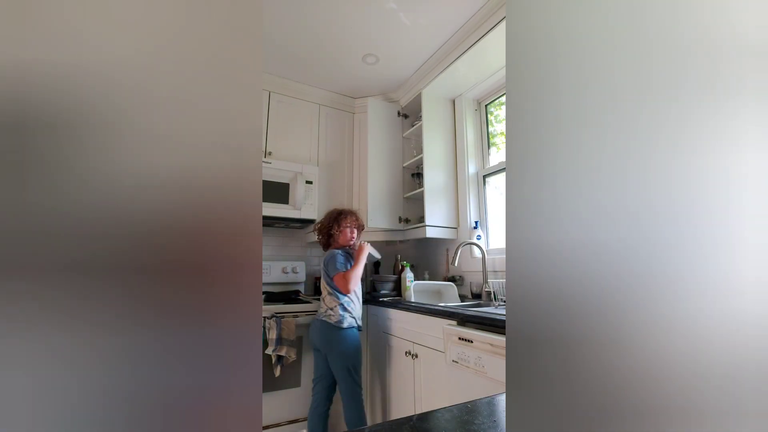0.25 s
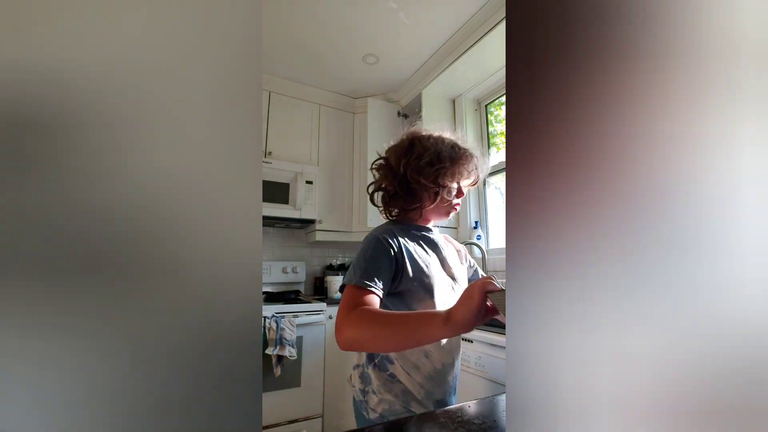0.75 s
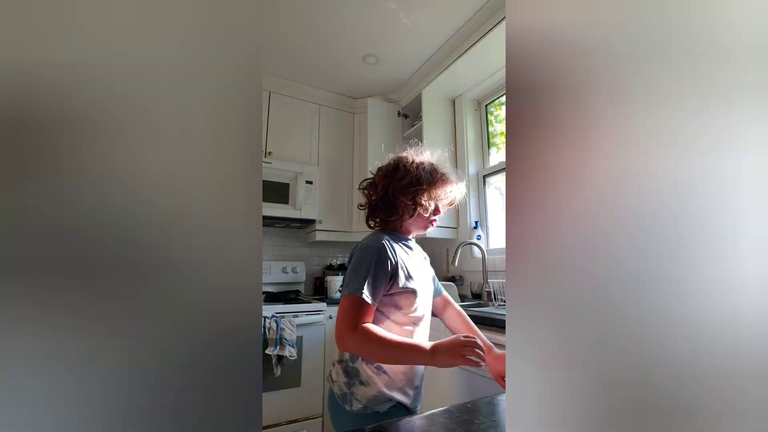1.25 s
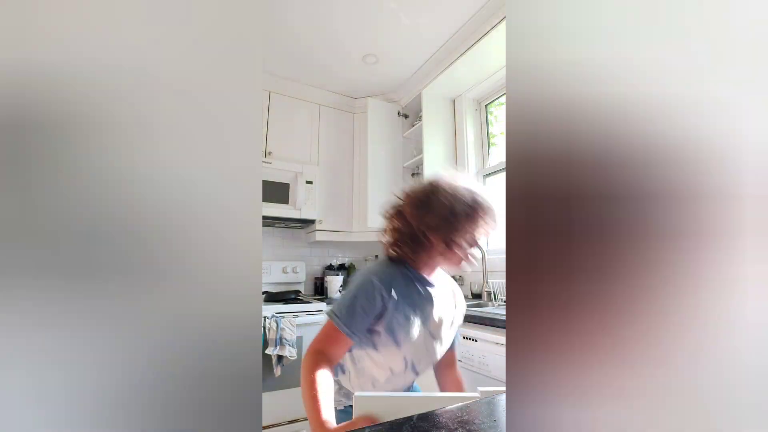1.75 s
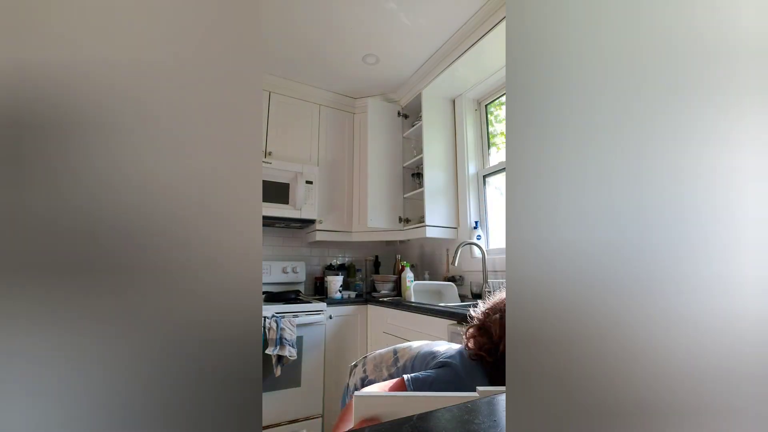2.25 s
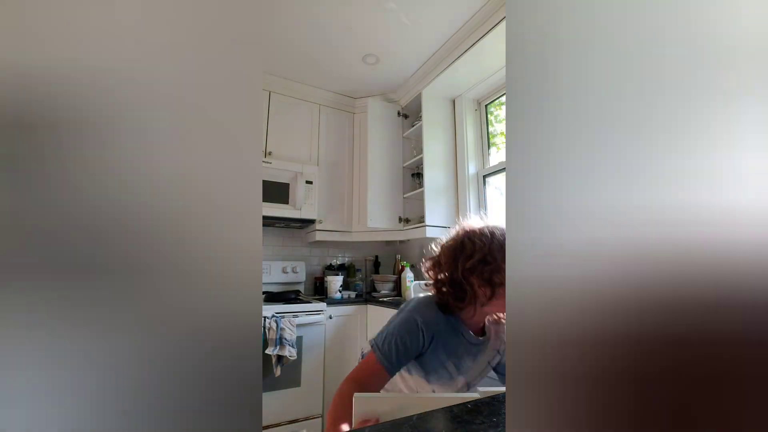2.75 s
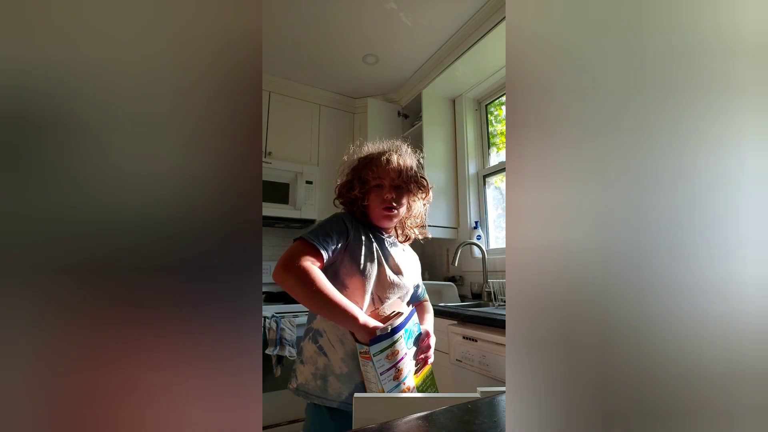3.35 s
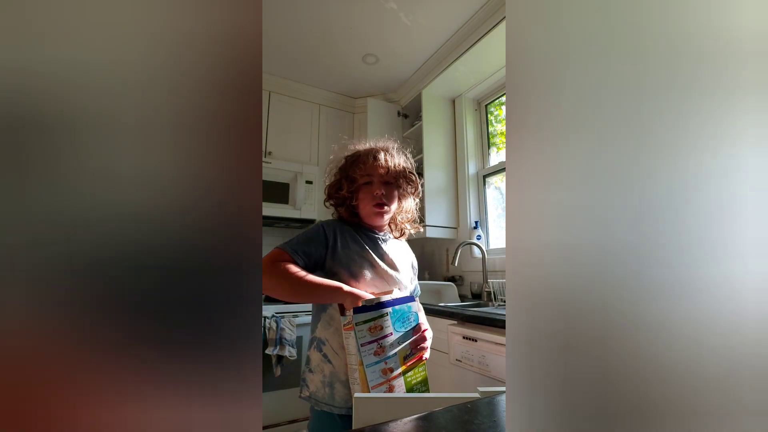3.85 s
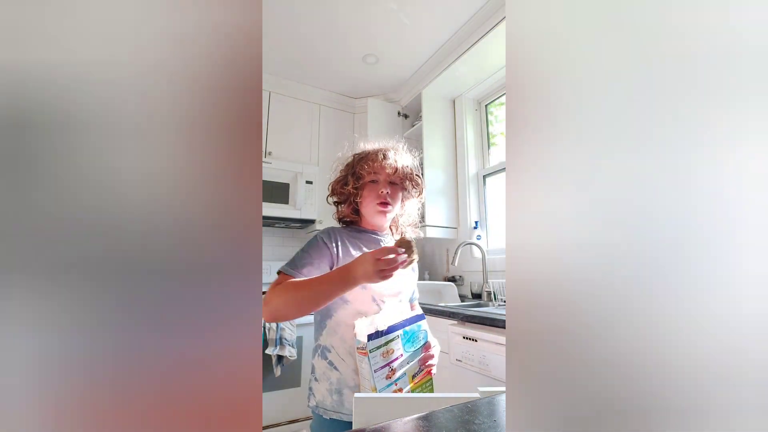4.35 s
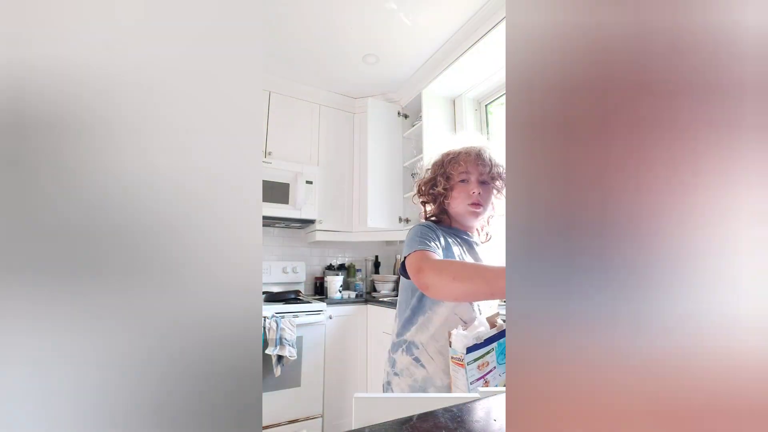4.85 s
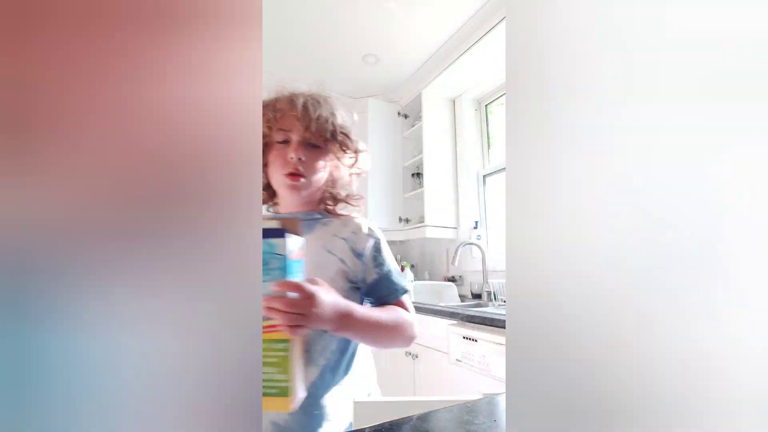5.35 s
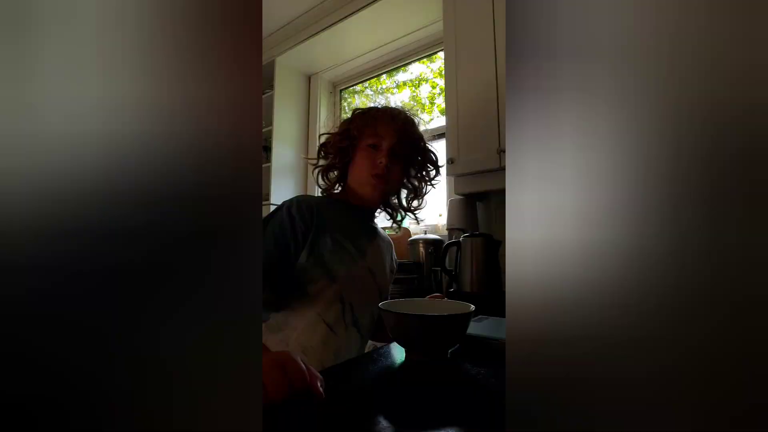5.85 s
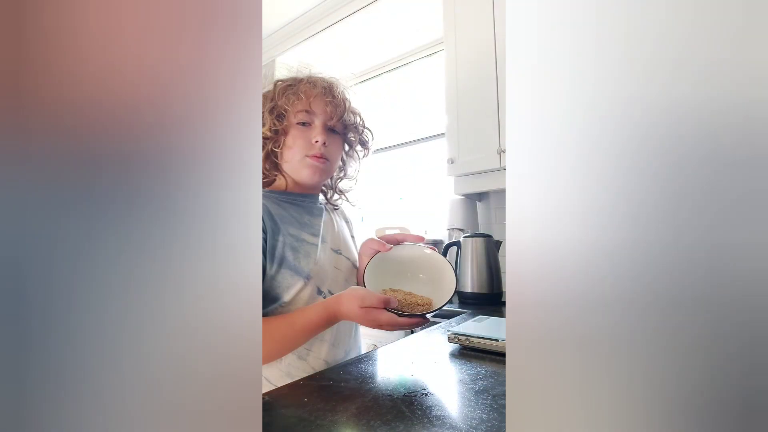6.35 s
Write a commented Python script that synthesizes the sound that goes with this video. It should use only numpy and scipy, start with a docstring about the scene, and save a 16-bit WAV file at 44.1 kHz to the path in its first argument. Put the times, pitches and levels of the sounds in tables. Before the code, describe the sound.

Cupboard and drawer bang in a quiet kitchen, then a cereal liner crinkles with dry flakes shifting, and finally a bowl knocks on the worktop.

```python
"""Someone fetches cereal in a quiet kitchen: cupboard, bowl and deep drawer bang and bump as thuds, clacks and cracks,
with noise strokes for sliding, short pitched noise bands for scrapes and faint resonances for the dishes.
Then each grip on the cereal box brings clumps of clicks from the liner and the dry flakes, with snaps of noise for buckles.
Amid the grips, near bumps on the counter make loose things ring, and a later knock rings briefly as a noise band.
Towards the end a low, steady rush of filtered noise sets in, and the bowl knocks on the worktop."""
import sys
import numpy as np
from scipy import signal
from scipy.fft import rfft, irfft, next_fast_len
from scipy.io import wavfile
from scipy.ndimage import uniform_filter1d, map_coordinates

SR = 44100
rng = np.random.default_rng(int(sys.argv[2]) if len(sys.argv) > 2 else 0)


def wrap_up_sound(samples):
    """Save the sound to the file named by the first command line argument, as 16-bit audio."""
    columns = np.atleast_2d(samples).T
    # keep every value between -1 and 1, then stretch to whole-number steps
    tamed = np.clip(columns, -1, 1)
    steps = np.round(tamed * 32767).astype(np.int16)
    wavfile.write(sys.argv[1], SR, steps)


N = 291060  # length of the scene in samples
BLOW = SR // 4  # longest single event in samples
AGE = np.arange(BLOW) / SR  # seconds since an event began
TIME = np.arange(N) / SR  # seconds since the scene began


def from_db(db):
    """Decibels to gain."""
    return np.exp(np.asarray(db) * (np.log(10) / 20))


def rms_one(x):
    """Scale to unit power."""
    return x / np.sqrt(np.mean(x ** 2) + 1e-20)


def panned(left_right_db):
    """Gains of the two sides for a level difference; positive leans left."""
    return from_db(np.array([[1], [-1]]) * left_right_db / 2)


def coloured(x, points):
    """Causal (minimum-phase) filter with the given spectrum."""
    size = 4096
    hz, db = np.transpose(points)
    bins_hz = np.arange(size // 2 + 1) * SR / size
    gain_db = np.interp(np.log(bins_hz + 1), np.log(hz), db)
    cepstrum = irfft(np.log(from_db(gain_db)))[:size // 2]
    # folding the cepstrum puts the energy as early as possible
    cepstrum[1:] *= 2
    kernel = irfft(np.exp(rfft(cepstrum, size)))[:size // 2]
    return signal.oaconvolve(x, kernel[None], axes=1)[:, :x.shape[1]]


def resonate(x, modes):
    """Parallel two-pole resonances with alternating signs."""
    out = 0
    for k, (hz, width_hz, db) in enumerate(modes):
        r = np.exp(-np.pi * width_hz / SR)
        zeros = [(1 - r * r) / 2, 0, (r * r - 1) / 2]
        poles = [1, -2 * r * np.cos(2 * np.pi * hz / SR), r * r]
        out = out + (-1) ** k * from_db(db) * signal.lfilter(zeros, poles, x + 1e-18)
    return out


def stereo_noise(size, alike):
    """Two white noises with a given likeness, from 0 (independent) to 1 (identical)."""
    mid, side = rng.standard_normal((2, size))
    return (np.sqrt(1 + alike) * mid + np.sqrt(1 - alike) * side * [[1], [-1]]) / np.sqrt(2)


def fade(t60, rise):
    """Envelope of a blow: it builds up over rise seconds, then falls exponentially, 60 dB in t60 seconds."""
    return (1 - np.exp(-AGE / rise)) ** 2 * np.exp(-np.log(1000) * AGE / t60)


def levelled(x, db, size=1323):
    """Set the level of a blow, its energy counted over size samples (30 ms by default)."""
    return x * from_db(db) / np.sqrt(np.sum(x ** 2) / (2 * size) + 1e-20)


def add(out, s, sound):
    """Mix a sound in at s seconds."""
    start = max(round(s * SR), 0)
    out[:, start:start + BLOW] += sound[:, :N - start]


def kitchen(x, wet_db, t60, alike):
    """Direct sound and a short wash of reflections from hard, close surfaces."""
    echo = levelled(stereo_noise(BLOW, alike) * fade(t60, rise=0.0016), wet_db, size=1)
    return x + signal.oaconvolve(x, echo, axes=1)[:, :N]


def drift(per_s):
    """Random curve with unit power that takes a new turn per_s times a second."""
    points = rng.standard_normal(4096)
    return rms_one(np.interp(TIME * per_s, np.arange(4096), points))


def grains(per_s, spread_db, clump_db):
    """Tiny clicks of uneven size that come in clumps, each reaching the two sides with its own strength."""
    born = rng.random(N) < per_s / SR
    sizes = from_db(spread_db * np.minimum(rng.exponential(1, N), 3) + clump_db * drift(70))
    clicks = born * sizes * (rng.choice([-1, 1], N) + 0.4 * rng.standard_normal((2, N)))
    # even out the power over about 40 ms
    return clicks / np.sqrt(uniform_filter1d(np.mean(clicks ** 2, axis=0), size=1800) + 1e-6)


def shifting(x, patchy_db, per_s):
    """The surface keeps changing shape, so each stretch of the spectrum swells and sinks by itself."""
    hz, s, frames = signal.stft(x, SR, nperseg=256)
    places = np.meshgrid(np.log1p(hz / 200) * 4, s * per_s, indexing="ij")
    swell = map_coordinates(rng.standard_normal((22, 700)), places, order=1)
    return signal.istft(frames * from_db(patchy_db * swell), SR)[1][:, :N]


# Tone of the quiet room. Each row: frequency in Hz, relative level in dB.
QUIET_SPECTRUM = [(21, -35), (35, -2), (90, 2), (200, -10.5), (529, -3), (798, -14), (2660, -12.5),
                  (6360, -20.5), (12400, -22.5), (16000, -46)]


def quiet_room(quiet_db=-79):
    """A very quiet room: faint filtered noise, nearly alike on both sides."""
    return from_db(quiet_db) * rms_one(coloured(stereo_noise(N, alike=0.95), QUIET_SPECTRUM))


# Sleeves, feet and the drawer sliding. Each row: start in seconds, length in seconds,
# then levels of friction, low rub and top hiss in dB; the swell peaks 3 dB above them.
SLIDES = [(0.0, 0.026, -55.5, -45, -77), (0.373, 0.12, -61, -65, -85), (0.512, 0.1, -54.5, -62, -68.5),
          (0.6, 0.078, -61, -55, -84), (0.677, 0.047, -61.5, -65, -60), (0.787, 0.069, -72, -74.5, -88.5),
          (0.857, 0.064, -64, -58.5, -68), (0.885, 0.028, -50, -53, -51.5), (0.925, 0.042, -55, -58, -82),
          (1.303, 0.3, -69.5, -65, -90), (1.367, 0.035, -56, -58, -85), (1.454, 0.07, -55, -50, -68),
          (1.553, 0.044, -57.5, -57, -63), (1.652, 0.17, -72, -68.5, -81), (1.706, 0.24, -70, -77.5, -72),
          (1.961, 0.04, -69, -66, -92.5), (1.997, 0.16, -82, -86, -99), (2.28, 0.061, -71, -73.5, -101),
          (2.341, 0.038, -61.5, -63, -82), (2.411, 0.081, -54.5, -56, -73)]
# Tone of the friction. Each row: frequency in Hz, relative level in dB.
FRICTION_SPECTRUM = [(300, -16.5), (800, 8.5), (1500, 3.5), (2600, 7), (4000, -1.5), (5500, -4),
                     (8000, -14.5), (16000, -26)]
# Tone of the low rub. Each row: frequency in Hz, relative level in dB.
RUB_SPECTRUM = [(40, -14), (90, -7), (160, 2.5), (240, -2.5), (400, -4), (700, -7), (1200, -16.5),
                (3000, -49)]
# Top end shared by slides, blows and liner. Each row: frequency in Hz, relative level in dB.
SPARKLE_SPECTRUM = [(3000, -52.5), (6500, -10.5), (8000, -2.5), (11500, 5), (14000, 0.5), (16500, 0)]


def sliding(swell=0.92, peak_share=0.28):
    """Each stroke swells and trails away: dense little slips, heard mostly through the room."""
    strokes = np.zeros((3, N))
    for s, length, *levels_db in SLIDES:
        progress = AGE / (length * peak_share)
        speed = (progress * np.exp(1 - progress)) ** swell
        add(strokes, s, np.sqrt(2) * from_db(levels_db)[:, None] * speed)
    friction_gain, rub_gain, hiss_gain = strokes
    slips = kitchen(grains(per_s=2600, spread_db=5.5, clump_db=-3.0), wet_db=7.5, t60=0.5, alike=0.095)
    slips = shifting(slips, patchy_db=2.1, per_s=20)
    friction = friction_gain * rms_one(coloured(slips, FRICTION_SPECTRUM))
    hiss = hiss_gain * rms_one(coloured(slips, SPARKLE_SPECTRUM))
    rub = rub_gain * rms_one(coloured(stereo_noise(N, alike=0.91), RUB_SPECTRUM))
    return friction + hiss + rub


# Low modes of the cabinet frames. Each row: frequency in Hz, relative level in dB.
FRAME_MODES = [(62, -7), (86, -5.5), (118, -5.5), (150, -2), (178, -8.5), (232, -9), (308, -10.5)]


def thud(note_hz, t60, frame_db, rise, sides):
    """The struck panel sounds its own note and shakes the low modes of the frame."""
    out = np.sin(2 * np.pi * note_hz * AGE) * sides
    for hz, db in FRAME_MODES:
        gain = from_db(db + frame_db + rng.normal(0, 0.4))
        out = out + gain * np.sin(2 * np.pi * hz * AGE + rng.uniform(0, 2 * np.pi))
    return out * fade(t60, rise)


# Resonances of the cabinets. Each row: frequency in Hz, width in Hz, relative level in dB.
CABINET_MODES = [(353.5, 20, -0.5), (504.3, 26, -1), (790, 36, -5.5), (950, 36, -4), (1210, 48, -4.5),
                 (1296, 28, -18.5), (1600, 64, -26)]
# Tone of the woody clack. Each row: frequency in Hz, relative level in dB.
CLACK_SPECTRUM = [(120, -23.5), (300, 8), (480, 18), (700, 3.5), (1000, 0), (1500, -31), (4000, -69)]
# Tone of the contact crack. Each row: frequency in Hz, relative level in dB.
CRACK_SPECTRUM = [(400, -14), (900, 0.5), (1300, -1), (2200, -4.5), (3000, -12), (5500, -16.5),
                  (7500, -29.5), (16000, -38.5)]


def blows(table, rise, frame_db, wood_db, hang):
    """Each blow is a low thud, a woody clack, and the crack and tick of the contact itself."""
    out = np.zeros((2, N))
    for s, thud_db, note_hz, clack_db, crack_db, tick_db, t60, pan_db in table:
        sides = panned(pan_db + 1.2)  # all blows lean a little further left than their row
        rattle = stereo_noise(BLOW, alike=0.92) * (fade(t60 * 0.84, rise * 0.65) + 0.87 * fade(0.015, rise))
        wood = coloured(rattle + from_db(wood_db) * resonate(rattle, CABINET_MODES), CLACK_SPECTRUM) * sides
        # the first contact is brief; reflections hang on after it
        contact = stereo_noise(BLOW, alike=0.062) * (fade(t60 * hang, rise) + 1.4 * fade(0.028, rise))
        low = levelled(thud(note_hz, t60, frame_db, rise, sides), thud_db)
        clack = levelled(wood, clack_db)
        crack = levelled(coloured(contact, CRACK_SPECTRUM), crack_db)
        tick = levelled(coloured(contact, SPARKLE_SPECTRUM), tick_db)
        add(out, s, low + clack + crack + tick)
    return out


# Doors and drawers struck across the room. Each row: start in seconds, thud in dB, panel note in Hz,
# clack in dB, crack in dB, tick in dB, thud decay (t60) in seconds, left-right balance in dB before a common lean.
KNOCKS = [(0.123, -25, 230, -16.5, -24.5, -46, 0.14, 0), (0.574, -43.5, 79.4, -62.5, -69, -84, 0.079, -2),
          (0.675, -35, 153, -51, -64, -59.5, 0.094, -1), (0.999, -36, 233, -38.5, -54, -77, 0.08, -3),
          (1.019, -34, 317, -40.5, -54.5, -85, 0.26, -10), (1.092, -23, 135, -26.5, -27.5, -39.5, 0.11, -1),
          (1.103, -21, 163, -26, -29, -50, 0.16, 4), (1.119, -22, 295, -23.5, -46, -66, 0.066, -18),
          (1.168, -33.5, 128.7, -38.5, -42.5, -61, 0.11, 1), (1.466, -40, 80, -39, -40.5, -79, 0.098, -1),
          (1.563, -48, 139.5, -51, -52.5, -61, 0.11, -2), (1.772, -32.5, 163.2, -43, -57.5, -62, 0.13, 1),
          (1.774, -40.5, 287, -44, -77, -77, 0.08, -6), (2.571, -44, 230, -42.5, -49.5, -73.5, 0.24, -2),
          (2.677, -36, 88, -42, -45.5, -65, 0.25, 0), (3.438, -38.5, 144, -49, -52, -60, 0.11, 3),
          (5.012, -36, 221, -42, -48, -64, 0.095, -4.5), (5.321, -46, 71, -43.5, -49, -59, 0.075, -2),
          (5.594, -34, 98, -42, -40, -54, 0.078, -3), (5.622, -39, 118, -31.5, -34, -50, 0.069, -1),
          (5.823, -41.5, 83, -51, -64.5, -75, 0.13, -2)]


def door_and_drawer_knocks():
    """Far blows build up softly and boom through the cabinets."""
    return blows(KNOCKS, rise=0.0041, frame_db=-2.5, wood_db=-3.5, hang=1.074)


# Dishes ringing faintly in sympathy. Each row: frequency in Hz, relative level in dB.
DISH_MODES = [(2260, -6), (2394, -5.5), (2656, -3), (3022, -2), (3391, -26), (3426, -11), (6255, -4.5)]


def dishes(x, width_hz=16, ring_db=-0.5):
    """Crockery picks up the clatter and rings on in narrow resonances."""
    return from_db(ring_db) * resonate(x, [(hz, width_hz, db) for hz, db in DISH_MODES])


# Short pitched noise bands: scrapes, and the brief ring of a knock at 5.6 s. Each row: start in seconds,
# length in seconds, start pitch in Hz, end pitch in Hz, bandwidth in Hz, level in dB.
PITCHED_BANDS = [(0.368, 0.095, 242, 221, 25, -54.5), (0.528, 0.059, 2400, 2510, 600, -53.5),
                 (0.538, 0.034, 4650, 4560, 300, -57), (0.586, 0.068, 1900, 1700, 700, -49.5),
                 (0.792, 0.055, 220, 210, 25.2, -62), (0.977, 0.046, 5600, 5650, 500, -79),
                 (1.312, 0.13, 230, 244, 25.3, -56.5), (2.408, .07, 522, 718, 400, -57),
                 (2.691, 0.15, 649, 1258, 262, -48.5), (1.664, 0.075, 433, 518, 200, -60.5),
                 (4.726, 0.164, 319.4, 259, 200, -54), (4.994, 0.056, 1715, 1868, 1260, -45.5),
                 (5.055, 0.081, 1223, 1260, 720, -55.5), (5.059, 0.11, 251, 299, 150, -58),
                 (5.613, 0.027, 654, 680, 160, -30), (6.128, 0.086, 5500, 5430, 900, -73.5),
                 (6.26, .21, 1500, 1700, 1300, -69), (6.281, 0.1, 5560, 5630, 910, -82)]


def pitched_bands():
    """Scrapes and the brief ring of a knock: noise in a band around a gliding pitch, swelling and sinking."""
    out = np.zeros((2, N))
    for s, length, start_hz, end_hz, width_hz, db in PITCHED_BANDS:
        progress = np.minimum(AGE / length, 1)
        phase = 2 * np.pi * np.cumsum(start_hz + (end_hz - start_hz) * progress) / SR
        noise = stereo_noise(BLOW, alike=0.86) + 1j * stereo_noise(BLOW, alike=0.26)
        low_pass = signal.butter(2, width_hz / 2, fs=SR, output="sos")
        unsteady = signal.sosfilt(low_pass, noise)
        # shift the noise up from zero to the gliding pitch
        band = np.real(unsteady * np.exp(1j * phase))
        add(out, s, levelled(band * np.sin(np.pi * progress), db, size=length * SR))
    return out


def held(s, length, attack_s=0.009, settle_db_per_s=403.5):
    """A grip takes hold quickly and stays; when it lets go, the creases settle."""
    attack = np.clip((TIME - s) / attack_s, 0, 1)
    return attack * from_db(-np.clip((TIME - s - length) * settle_db_per_s, 0, 200))


# Grips on the cereal box and its liner. Each row: start in seconds, time held in seconds,
# strength in dB, top sparkle relative to it in dB.
GRIPS = [(2.563, 0.15, -57, -12.5), (2.682, 0.11, -51.5, -6.5), (2.73, 0.092, -47.5, -6),
         (2.87, 0.036, -50.5, -8.5), (2.93, 0.056, -52, -7), (2.975, 1.27, -46.5, -5),
         (3.049, 0.12, -37.5, -5.5), (3.159, 0.16, -36.5, -6.5), (3.335, 0.062, -34, -8),
         (3.418, 0.043, -36, -7.5), (3.521, 0.12, -41, -9), (3.704, 0.053, -39, -6.5),
         (3.738, 0.027, -36, -9), (3.789, 0.14, -39.5, -2), (3.831, 0.022, -34.5, -13),
         (3.927, 0.066, -33, -4), (4.041, 0.075, -38, -1), (4.166, 0.026, -33.5, -2.5),
         (4.196, 0.03, -29, -3), (4.278, 0.012, -45.5, -3), (4.31, 0.16, -65, -7), (4.409, 0.018, -59, -1),
         (4.463, 0.22, -60.5, -4), (4.62, 0.0094, -40.5, -5), (4.68, 0.15, -54.5, -4),
         (4.873, 0.07, -55, 3), (4.933, 0.018, -42, 1), (5.04, 0.088, -64, -10), (5.203, 0.035, -58.5, -8),
         (5.235, .145, -52, -7), (5.3, 0.014, -57, 7.5), (5.367, 0.024, -44.5, -7.5),
         (5.395, 0.028, -44, -8), (5.433, 0.012, -36, -24), (5.5, 0.17, -54.5, -9),
         (5.593, 0.041, -38, -9.5), (5.74, 0.029, -52.5, -5), (6.034, 0.018, -62.5, -5.5)]


def gripping():
    """Gain of the liner's crinkle and of its top sparkle; overlapping grips add in power."""
    power = np.zeros((2, N))
    for s, length, db, sparkle_db in GRIPS:
        power += (from_db([[db], [db + sparkle_db]]) * held(s, length)) ** 2
    return np.sqrt(power)


def crunches(per_s, spread_db, cycles):
    """Single flakes tick against each other, each with a brief pitch of its own."""
    age = AGE[:600]
    out = np.zeros((2, N + len(age)))
    for when, pitch, size, left, right in rng.random((int(per_s * N / SR), 5)):
        hz = 700 * 12 ** pitch
        # each tick falls 60 dB within the given number of cycles
        tick = np.sin(2 * np.pi * hz * age) * np.exp(-np.log(1000) * age * hz / cycles) * np.sqrt(hz)
        sides = np.array([[left], [right]]) - 0.25
        start = int(when * N)
        out[:, start:start + len(age)] += tick * from_db(spread_db * size ** 2) * sides
    return rms_one(kitchen(out[:, :N], wet_db=-2.5, t60=0.03, alike=0.11))


# Tone of the crinkling liner. Each row: frequency in Hz, relative level in dB.
CRINKLE_SPECTRUM = [(300, -27.5), (700, 3), (1200, 5), (1800, 2.5), (2400, 2), (4000, -0.5), (6300, -4.5),
                    (7500, -13.5), (10000, -15.5), (16000, -27)]
# Tone of the flakes in their carton. Each row: frequency in Hz, relative level in dB.
FLAKE_SPECTRUM = [(50, -34), (150, -9), (220, -11), (330, -0.5), (450, 5), (650, -0.5), (1000, -1.5),
                  (1500, -32), (4000, -34)]
# Resonances of the carton. Each row: frequency in Hz, width in Hz, relative level in dB.
CARTON_MODES = [(391, 32, -6), (480, 16, 5), (532, 28, -5.5), (632.2, 15, 8.5), (722, 23, -16.5),
                (1033, 46, -1), (1220, 28, -1.5)]


def cereal(crinkle, sparkle, flakes_db=-3, carton_db=4, crunch_db=-4):
    """Small creases crackle all over the liner; flakes tumble against the resonant carton."""
    # every patch of the liner has its own reflections
    patches = [kitchen(grains(per_s=220, spread_db=3.0, clump_db=0.0), wet_db=12.5, t60=0.15, alike=0.1)
               for _ in range(3)]
    creases = rms_one(shifting(sum(patches), patchy_db=3.5, per_s=36))
    tumble = kitchen(grains(per_s=600, spread_db=5.5, clump_db=6.0), wet_db=-7.5, t60=0.058, alike=1.0)
    tumble = shifting(tumble, patchy_db=0.5, per_s=20)
    carton = coloured(tumble + from_db(carton_db) * resonate(tumble, CARTON_MODES), FLAKE_SPECTRUM)
    return (crinkle * rms_one(coloured(creases, CRINKLE_SPECTRUM))
            + from_db(crunch_db) * crinkle * crunches(per_s=170, spread_db=18.0, cycles=12.4)
            + sparkle * rms_one(coloured(creases, SPARKLE_SPECTRUM))
            + from_db(flakes_db) * crinkle * rms_one(carton))


def flicks(crinkle, sparkle, flick_db=-8, bright_db=-8):
    """Creases that face the listener arrive with little echo, as separate crisp ticks."""
    ticks = kitchen(grains(per_s=70, spread_db=7.5, clump_db=-10.5), wet_db=1.0, t60=0.019, alike=0.22)
    body = from_db(flick_db) * crinkle * rms_one(coloured(ticks, CRINKLE_SPECTRUM))
    top = from_db(bright_db) * sparkle * rms_one(coloured(ticks, SPARKLE_SPECTRUM))
    return body + top


# Sharp buckles of the liner. Each row: start in seconds, then direct levels of the snap,
# carton pop and top sparkle in dB.
SNAPS = [(3.0312, -45, -42.5, -57), (3.052, -34.5, -39, -45), (3.2155, -37.5, -35.5, -45),
         (3.2652, -45, -42.5, -50), (3.2898, -45, -67, -43.5), (3.446, -38.5, -58, -44.5),
         (3.5192, -40, -53, -54), (3.652, -64, -42.5, -54), (3.7, -43.5, -39.5, -49),
         (3.8942, -61, -45, -62), (4.0489, -40, -52, -38), (4.145, -30, -40, -33),
         (4.1667, -32.5, -30, -38), (4.1749, -28, -38, -37.5), (4.2169, -39.5, -43, -37),
         (5.2363, -57.5, -50.5, -67), (5.324, -51, -43.5, -63), (5.401, -48, -39.5, -53),
         (5.4283, -45, -46, -38), (5.5178, -76, -53.5, -59), (5.626, -44, -29, -59),
         (5.6546, -55, -61, -48)]


def snaps(snap_t60=0.019, lowest_hz=380, pan_db=-4):
    """A crease gives way in a few milliseconds and pops the carton wall, which is too small to boom."""
    out = np.zeros((2, N))
    sides = panned(pan_db)
    no_bass = signal.butter(2, lowest_hz, "high", fs=SR, output="sos")
    for s, snap_db, pop_db, sparkle_db in SNAPS:
        buckle = stereo_noise(BLOW, alike=0.18) * fade(snap_t60, rise=0.00033) * sides
        wall = coloured(stereo_noise(BLOW, alike=1.0) * fade(0.057, rise=0.0002), FLAKE_SPECTRUM)
        snap = levelled(coloured(buckle, CRINKLE_SPECTRUM), snap_db)
        pop = levelled(signal.sosfilt(no_bass, wall), pop_db)
        top = levelled(coloured(buckle, SPARKLE_SPECTRUM), sparkle_db)
        add(out, s, snap + pop + top)
    return kitchen(out, wet_db=-11.5, t60=0.12, alike=0.1)


# Bumps on the counter, close by. Each row: start in seconds, thud in dB, panel note in Hz,
# clack in dB, crack in dB, tick in dB, thud decay (t60) in seconds, left-right balance in dB before a common lean.
BUMPS = [(4.527, -35.5, 185, -40.5, -65, -69, 0.11, -5), (4.585, -27, 312, -34.5, -56, -57.5, 0.062, -12),
         (4.623, -32, 264, -43, -60, -60, 0.22, -20), (4.631, -25, 163, -33.5, -51, -42.5, 0.077, -3.5),
         (4.681, -30.5, 135, -43.5, -65, -57, 0.093, -2), (4.699, -31, 165, -42, -58, -56, 0.068, -4),
         (4.934, -38, 295, -38.5, -54, -51, 0.063, -18)]
# Loose things on the counter. Each row: frequency in Hz, width in Hz, relative level in dB.
LOOSE_MODES = [(1934, 40, 12), (2660, 51, 16), (3400, 46, -4), (10200, 220, 4)]


def counter_bumps():
    """Near blows have a sharp onset, and loose things on the counter ring."""
    near = blows(BUMPS, rise=0.00098, frame_db=-5.5, wood_db=-7.0, hang=0.49)
    return near + resonate(near, LOOSE_MODES)


# Tone of the closing rush. Each row: frequency in Hz, relative level in dB.
RUSH_SPECTRUM = [(35, -6), (70, -9), (150, -1.5), (230, -9.5), (370, 2), (550, -11.5), (900, -17),
                 (1500, -22), (2500, -35), (5000, -42), (9000, -47)]


def rush_of_air(start_s=5.74, air_db=-56):
    """A low, steady rush like a fan sets in near the end, stronger on the right."""
    rush = rms_one(coloured(stereo_noise(N, alike=0.93), RUSH_SPECTRUM))
    return from_db(air_db) * (TIME > start_s) * rush * panned(-3)


# The bowl lands on the worktop and rocks once. Each row: start in seconds, thud in dB, panel note in Hz,
# clack in dB, crack in dB, tick in dB, thud decay (t60) in seconds, left-right balance in dB before a common lean.
BOWL = [(6.1, -24, 322, -36, -51, -85, 0.072, -18), (6.113, -28, 317, -32, -55.5, -77, 0.047, -2.5)]


def bowl_landing():
    """Two blows in quick succession, whose contact noise hangs on well after the thud."""
    return blows(BOWL, rise=0.0021, frame_db=-4.0, wood_db=-6.0, hang=2.6)


def later(x, lag_ms):
    """Delay by a fraction of a millisecond, as a phase slope over frequency."""
    size = next_fast_len(N + 256)
    turn = np.exp(-2j * np.pi * np.fft.rfftfreq(size, 1 / SR) * lag_ms / 1000)
    return irfft(rfft(x, size) * turn, size)[:, :N]


# The left side is shaded, most of all in the high treble. Each row: frequency in Hz, left-right difference in dB.
SHADE = [(100, -3), (500, -4), (1500, -2.5), (2500, -7), (5000, -3), (7000, -2.5), (9000, -9),
         (16000, -10.5)]


def scene():
    """All the handling happens to the right: the left side hears it later and duller."""
    crinkle, sparkle = gripping()
    handling = (sliding() + door_and_drawer_knocks() + pitched_bands()
                + cereal(crinkle, sparkle) + flicks(crinkle, sparkle) + snaps()
                + counter_bumps() + bowl_landing())
    both = handling + dishes(handling) + quiet_room() + rush_of_air()
    left = later(coloured(both[:1], [(hz, db / 2) for hz, db in SHADE]), lag_ms=0.16)
    right = coloured(both[1:], [(hz, -db / 2) for hz, db in SHADE])
    return np.vstack([left, right])


def record(dry, low_cut_hz=42, top_cut_hz=16000):
    """The deepest bass is rolled off, peaks are clipped at full scale and the top is cut steeply."""
    low_cut = signal.butter(2, low_cut_hz, "high", fs=SR, output="sos")
    top_cut = signal.ellip(10, 0.1, 80, top_cut_hz, fs=SR, output="sos")
    thinned = signal.sosfilt(low_cut, dry)
    return signal.sosfilt(top_cut, np.clip(thinned, -1, 1))


dry = scene()
out = record(dry)
wrap_up_sound(out)
```